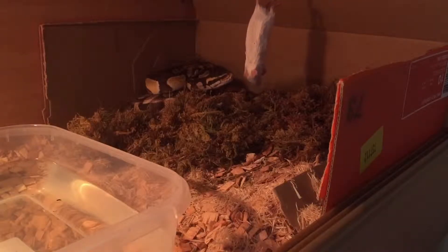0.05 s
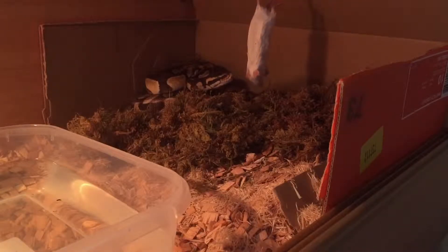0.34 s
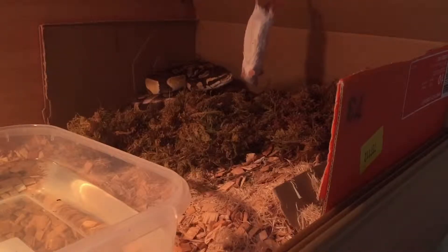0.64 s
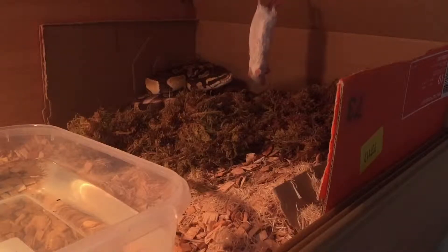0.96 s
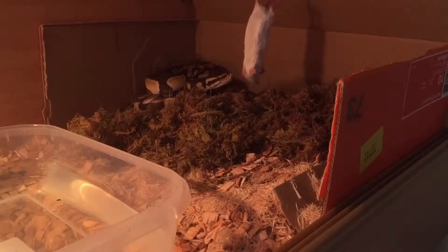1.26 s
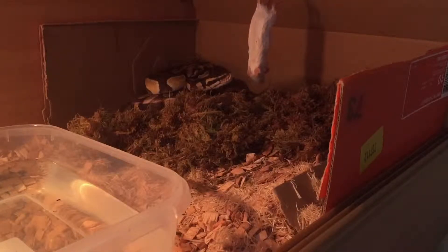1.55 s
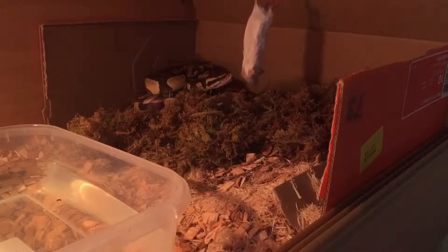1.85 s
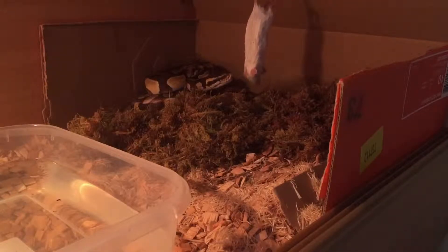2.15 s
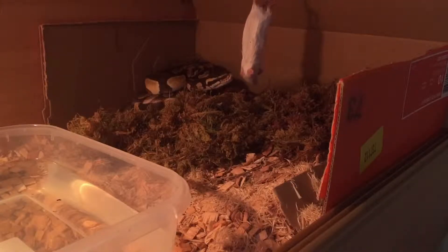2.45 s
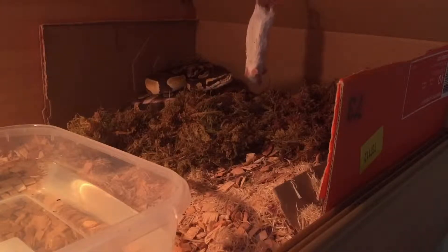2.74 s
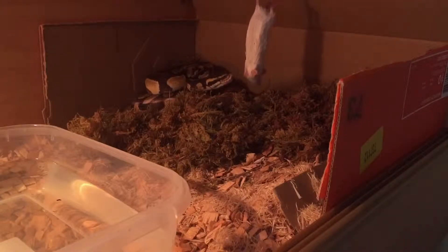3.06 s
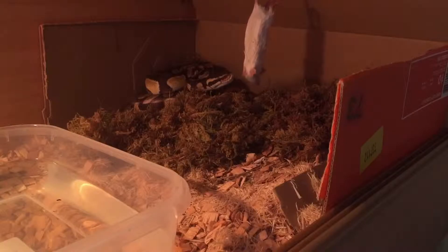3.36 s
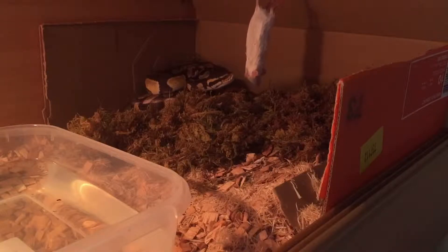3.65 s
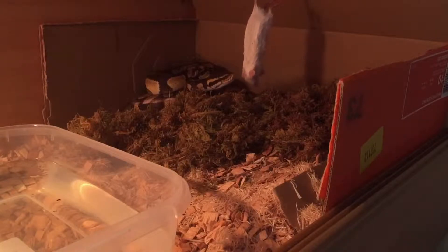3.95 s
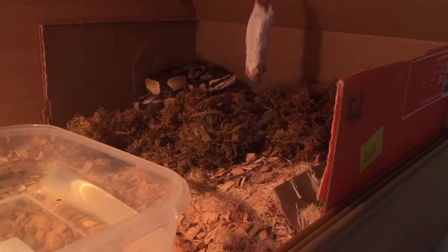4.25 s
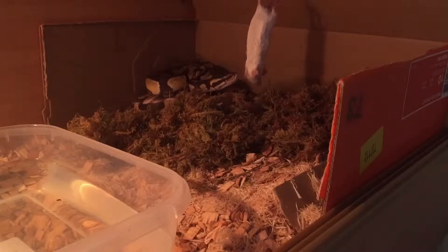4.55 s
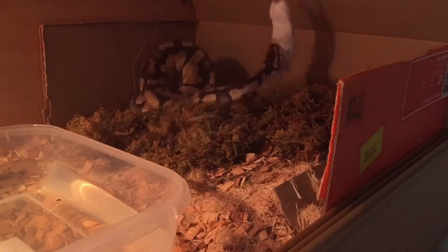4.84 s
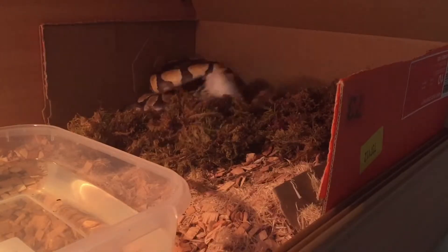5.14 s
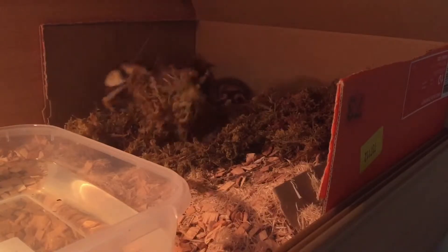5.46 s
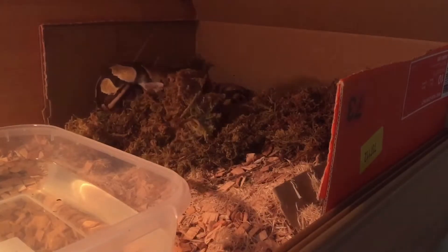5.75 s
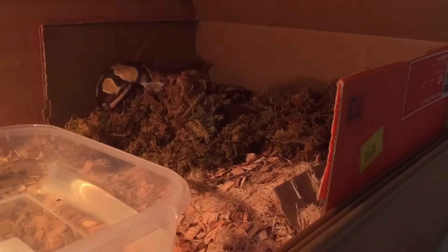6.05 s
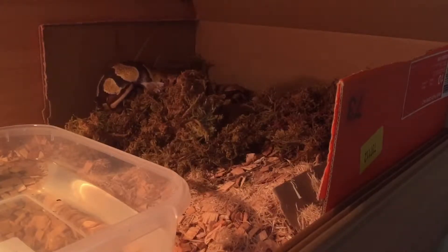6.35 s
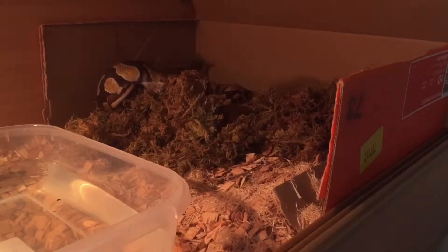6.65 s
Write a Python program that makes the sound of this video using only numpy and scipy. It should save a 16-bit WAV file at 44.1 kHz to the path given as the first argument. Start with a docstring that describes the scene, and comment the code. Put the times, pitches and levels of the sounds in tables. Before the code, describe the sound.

A quiet, low, throbbing hum and faint hiss fill a small room throughout, with one very soft bump at about 2.8 seconds. At 4.8 seconds, close to the microphone, moss rustles briefly as a snake lunges at a mouse. At 5 seconds its body slaps sharply against a cardboard box and lands with dull, hollow thumps. Lighter knocks and soft rustles follow as it coils, with one thin, very high squeak at 5.3 seconds that dips slightly in pitch. Another thump and knock come near 5.6 seconds, and the movement dies away by 5.9. At 6.3 seconds something hard, probably feeding tongs, is put down nearby with a bright, ringing clack, a quick bounce and a short rattle. Faint handling scuffs and a soft low bump follow until about 7 seconds.

```python
"""Python striking in a cardboard hide

A quiet room with a low hum, one microphone close to the hide. A python strikes at a mouse held over
moss: the moss rustles, the snake slaps the cardboard and thumps down as it coils round its prey,
with one thin squeak. Then something hard, probably the feeding tongs, is put down nearby with a
ringing clack and a short rattle."""
import sys
import numpy as np
from scipy import signal
from scipy.fft import rfft, irfft, next_fast_len
from scipy.io import wavfile

SR = 44100
rng = np.random.default_rng(int(sys.argv[2]) if len(sys.argv) > 2 else 0)


def int16_out(signal):
    """Quantize to a 16-bit WAV file."""
    q = np.round(np.clip(np.atleast_2d(signal).T, -1, 1) * 32767)
    wavfile.write(sys.argv[1], SR, q.astype(np.int16))


N = 304290
TIME = np.arange(N) / SR

# room air and hiss: f/Hz, relative density/dB
AIR_SPECTRUM = [(20, -27), (36, -18), (52, -2.5), (75, 1), (130, -8.5), (330, -10), (700, -19),
                (1400, -22.5), (2300, -21.5), (4200, -25), (4900, -28.5), (5600, -25.5), (7700, -28),
                (9500, -30.5)]
# low bands in which the room drones: f/Hz, width/Hz, level/dB
DRONE_BANDS = [(50.6, 19.4, -68), (93.6, 11, -79), (191.8, 12, -83.5), (243, 18, -83)]
# the mains tone and its octave: level/dB
MAINS_LEVELS = [-69.5, -83]
# a distant motor's turning rate, then overtones one mains step apart: level/dB
MOTOR_LEVELS = [-67.5, -74, -87, -81.5]

# soft handling after the clack: peak t/s, level/dB, length/s
SCUFF_STROKES = [(6.558, -66, 0.11), (6.675, -63, 0.18), (6.85, -63, 0.19)]
# colour of that handling: f/Hz, relative density/dB
SCUFF_SPECTRUM = [(300, 0.5), (1100, -6.5), (1900, 4), (2700, -10.5), (3700, -0.5), (4800, -14),
                  (6500, -12), (10000, -20)]
# the tongs land, bounce and settle: t/s, relative ring/dB, relative crack/dB
TONG_CONTACTS = [(6.3011, -35, -25.5), (6.3113, -35, -28.5), (6.3708, -54, -43)]
# modes of the clack: f/Hz, relative level/dB, t60 before damping/s
TONG_MODES = [(150, -15, 0.12), (306, -15, 0.18), (424, -4, 0.12), (459, -15, 0.28), (693, -7, 0.23),
              (761, -4, 0.2), (781, -1, 0.26), (1217, -1, 0.22), (1281, 4, 0.16), (1659, -6, 0.06),
              (1882, -9, 0.13), (1983, -5, 0.16), (2050, -6, 0.08), (2235, -15, 0.21), (2370, -13, 0.24),
              (2765, -5, 0.11), (2846, -3, 0.12), (2925, -2, 0.14), (3247, -7, 0.07), (3738, -10, 0.11),
              (4320, -6, 0.1), (4547, -8, 0.06), (5509, -4, 0.06), (6663, -9, 0.06), (6950, -17, 0.18),
              (7070, -9, 0.08), (8423, -10, 0.06), (9401, -9, 0.08)]
# colour of the tongs' crack and chatter: f/Hz, relative density/dB
CRACK_SPECTRUM = [(100, -21), (400, -2), (1000, -3), (1700, 1), (3000, 8.5), (3700, -8), (4400, 5),
                  (5100, -5), (5500, 3.5), (6200, -7.5), (6900, 3.5), (7500, -9), (8500, -0.5),
                  (10500, -11.5)]
# the tongs brush the surface, chatter and rock to rest: peak t/s, relative level/dB, length/s
CHATTER_STROKES = [(6.298, -62, 0.025), (6.369, -35, 0.054), (6.405, -58.5, 0.23)]

# the snake drags the moss as it lunges, pulls back and coils: peak t/s, level/dB, length/s
MOSS_DRAGS = [(4.835, -58, 0.091), (4.95, -70, 0.34), (5.045, -48, 0.07), (5.33, -65.5, 0.38),
              (5.455, -67.5, 0.31), (5.555, -66, 0.26)]
# colour of dragged moss: f/Hz, relative density/dB
MOSS_SPECTRUM = [(300, 4.5), (1000, -12), (2500, -5), (6000, -6), (10000, -9.5)]
# blows to the floor of the hide from snake and tongs: t/s, relative level/dB, contact f/Hz
FLOOR_BLOWS = [(2.779, -47.5, 70), (4.836, -50.5, 146), (4.999, -39, 58), (5.028, -38.5, 273),
               (5.078, -32.5, 44), (5.187, -53.5, 138), (5.273, -44.5, 73), (5.319, -47, 54),
               (5.5637, -32.5, 168), (5.689, -45, 58), (6.302, -49, 230), (6.626, -46.5, 49.7)]
# low modes of the hide: f/Hz, relative level/dB, t60/s
HIDE_MODES = [(70, -7.5, 0.2), (87.5, -4, 0.36), (111.4, -3.5, 0.25), (202, -1.5, 0.077), (251.3, 0, 0.1),
              (381.6, 0.5, 0.09)]
# snake, moss and bark hit the cardboard: t/s, relative level/dB, centre f/Hz, width/octaves, t60/s
WALL_KNOCKS = [(5.0266, -29.5, 2460, 2.48, 0.036), (5.0278, -22.5, 1650, 2.65, 0.024),
               (5.0390, -34.5, 1220, 4.3, 0.052), (5.0396, -28.5, 8460, 0.27, 0.029),
               (5.0730, -60, 2300, 1.5, 0.034), (5.098, -39, 2480, 2, 0.024),
               (5.1440, -48, 4770, 0.88, 0.012), (5.1960, -61.5, 1100, 1.2, 0.077),
               (5.2542, -50.5, 1086, 0.46, 0.04), (5.2833, -45, 1520, 1.43, 0.054),
               (5.485, -58.5, 1030, 0.94, 0.044), (5.563, -45, 1310, 1.86, 0.056),
               (5.5699, -45.5, 1290, 2.1, 0.024), (5.893, -58.5, 1010, 0.41, 0.03)]
# broad resonances of the cardboard wall: f/Hz, width/Hz, gain/dB
WALL_RESONANCES = [(746, 77, 1), (955, 120, 3), (1114, 45, 0.5), (1590, 44, -4), (2300, 120, -4.5),
                   (3030, 170, -2)]


def from_db(db):
    """Decibels to gain."""
    return 10 ** (np.asarray(db) / 20)


def rms_one(x):
    """Scale to rms 1."""
    return x / np.sqrt(np.mean(x ** 2) + 1e-20)


def coloured(x, spectrum):
    """Give x a smooth spectrum; rms 1."""
    hz, level_db = np.transpose(spectrum)
    size = next_fast_len(N)
    bin_hz = np.maximum(np.fft.rfftfreq(size, 1 / SR), 1)
    gain = from_db(np.interp(np.log(bin_hz), np.log(hz), level_db))
    return rms_one(irfft(rfft(x, size) * gain, size)[:N])


def band_noise(low_hz, high_hz):
    """Noise between two edges, already running at the start; rms 1."""
    band = signal.butter(2, [low_hz, high_hz], "band", fs=SR, output="sos")
    return rms_one(signal.sosfilt(band, rng.standard_normal(N + SR))[SR:])


def dulled(x, hz):
    """A gentle low-pass."""
    return signal.lfilter(*signal.butter(1, hz, fs=SR), x + 1e-18)


def click(s):
    """A unit impulse at time s."""
    return 1. * (np.arange(N) == round(s * SR))


def dying(s, t60):
    """An envelope that jumps to 1 at time s and dies away."""
    return (TIME >= s) * np.exp(-np.log(1000) * np.clip((TIME - s) / t60, 0, 10))


def ring(blows, modes, damping=1):
    """Blows set each mode ringing as a dying sine; neighbouring modes swing in opposite directions."""
    out = np.zeros(N)
    for k, (hz, level_db, t60) in enumerate(modes):
        decay = np.exp(-np.log(1000) * damping / (t60 * SR))
        step = 2 * np.pi * hz / SR
        mode = signal.lfilter([0, np.sin(step)], [1, -2 * decay * np.cos(step), decay ** 2], blows + 1e-18)
        out += (-1) ** k * from_db(level_db) * mode
    return out


def strokes(rows, rise_share, edge_db=19):
    """Each movement swells evenly in dB and falls away; its start and end lie edge_db under its peak."""
    power = 0
    for s, level_db, length_s in rows:
        from_peak = np.maximum((s - TIME) / rise_share, (TIME - s) / (1 - rise_share)) / length_s
        power += from_db(level_db - edge_db * np.minimum(from_peak, 10)) ** 2
    return np.sqrt(power)


def rustle(spectrum, per_s, spread_db):
    """Many tiny slips and snaps, each with a size of its own; rms 1."""
    sizes = from_db(spread_db * np.minimum(rng.exponential(1, N), 4)) * rng.choice([-1, 1], N)
    grains = sizes * (rng.random(N) < per_s / SR)
    return coloured(grains, spectrum)


def hum(motor_hz=46.24, mains_hz=50.01, in_step_s=0.18, waver_db=2.0):
    """A distant motor turns a little slower than the mains, so their wavering tones beat."""
    tones = [(mains_hz * (k + 1), level_db) for k, level_db in enumerate(MAINS_LEVELS)]
    tones += [(motor_hz + mains_hz * k, level_db) for k, level_db in enumerate(MOTOR_LEVELS)]
    beating = sum(from_db(level_db) * np.sqrt(2) * np.sin(2 * np.pi * hz * (TIME - in_step_s))
                  for hz, level_db in tones)
    return beating * from_db(waver_db * band_noise(0.59, 3.4))


def room_tone(air_db=-67.5):
    """Steady hiss and rumble all round the microphone, under the throbbing hum."""
    drone = sum(from_db(level_db) * band_noise(hz - width_hz / 2, hz + width_hz / 2)
                for hz, width_hz, level_db in DRONE_BANDS)
    return hum() + drone + from_db(air_db) * coloured(rng.standard_normal(N), AIR_SPECTRUM)


def reflections(direct, level_db=-19.5, first_echo_s=0.009, t60=0.34, wall_cut_hz=2600):
    """Near walls send dense, dull, short-lived echoes back to the microphone."""
    echoes = dulled(rng.standard_normal(N), wall_cut_hz) * dying(first_echo_s, t60)
    response = echoes[:SR] / np.sqrt(np.sum(echoes ** 2))
    return from_db(level_db) * signal.fftconvolve(direct, response)[:N]


def scuffs():
    """Soft handling friction, faint at the microphone, once the tongs are down."""
    return strokes(SCUFF_STROKES, rise_share=0.52) * rustle(SCUFF_SPECTRUM, per_s=4900, spread_db=2.0)


def tongs(crack_t60=0.032, ring_gain_db=1.05, crack_gain_db=3.0):
    """Close by, each contact cracks brightly and rings the same modes; tiny fast bounces follow."""
    blows = sum(from_db(ring_db) * click(s) for s, ring_db, _ in TONG_CONTACTS)
    ringing = from_db(ring_gain_db) * ring(blows, TONG_MODES, damping=1.2)
    force = sum(from_db(crack_db) * dying(s, crack_t60) for s, _, crack_db in TONG_CONTACTS)
    crack = from_db(crack_gain_db) * force * coloured(rng.standard_normal(N), CRACK_SPECTRUM)
    rocking = strokes(CHATTER_STROKES, rise_share=0.63)
    chatter = rocking * rustle(CRACK_SPECTRUM, per_s=2700, spread_db=4.0)
    return ringing + crack + dulled(chatter, hz=5600)


def moss():
    """Fibres slip and snap as the snake drags over them."""
    return strokes(MOSS_DRAGS, rise_share=0.49) * rustle(MOSS_SPECTRUM, per_s=1700, spread_db=2.0)


def squeak(start_s=5.304, start_hz=6440, sag_hz_per_s=5000, level_db=-50.5, attack_s=0.004, t60=0.13):
    """One thin, slightly rough whistle as the coils tighten, sagging in pitch as it dies."""
    age = np.clip(TIME - start_s, 0, t60)
    hz = start_hz - sag_hz_per_s * age
    envelope = from_db(level_db) * np.minimum(age / attack_s, 1) * dying(start_s, t60)
    rasp = 1 + 0.28 * rms_one(dulled(rng.standard_normal(N), hz=300))
    return envelope * rasp * np.sqrt(2) * np.sin(2 * np.pi * np.cumsum(hz) / SR)


def thumps(spread_ratio=1.35, lowest_hz=45):
    """A body presses in and lets go, ringing the low modes of the hide; softer contacts are deeper."""
    pushes = np.zeros(N)
    for s, level_db, hz in FLOOR_BLOWS:
        contact = signal.butter(1, [hz / spread_ratio, hz * spread_ratio], "band", fs=SR)
        pushes += from_db(level_db) * signal.lfilter(*contact, click(s) + 1e-18)
    bass_loss = signal.butter(2, lowest_hz, "high", fs=SR)   # the thumps carry no deep bass
    return signal.lfilter(*bass_loss, ring(pushes, HIDE_MODES))


def knocks(gain_db=-2.5):
    """Each knock is a brief crush of fibres, pitched by the spot that is hit and coloured by the wall."""
    hits = np.zeros(N)
    for s, level_db, hz, octaves, t60 in WALL_KNOCKS:
        low, high = hz / 2 ** (octaves / 2), hz * 2 ** (octaves / 2)
        crush = from_db(level_db) * rng.standard_normal(N) * dying(s, t60)
        spot = signal.butter(3, [low, high], "band", fs=SR, output="sos")
        width_gain = np.sqrt(SR / 2 / (high - low))   # same level at any width
        hits += width_gain * signal.sosfilt(spot, crush + 1e-18)
    wall = np.zeros(N)
    for hz, width_hz, peak_db in WALL_RESONANCES:
        resonance = signal.iirpeak(hz, hz / width_hz, fs=SR)
        wall += from_db(peak_db) * signal.lfilter(*resonance, hits + 1e-18)
    return from_db(gain_db) * (hits + wall)


def scene():
    """Snake and tongs close to one microphone, the small room well behind them."""
    snake = knocks() + thumps() + squeak() + moss()
    hand = tongs() + scuffs()
    direct = snake + hand
    return (direct + reflections(direct) + room_tone())[None]


def record(dry):
    """The microphone signal is cut steeply at the top."""
    cutoff_hz = 10050
    return signal.sosfilt(signal.butter(32, cutoff_hz, fs=SR, output="sos"), dry)


dry = scene()
out = record(dry)
int16_out(out)
```